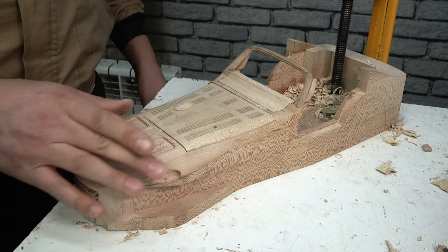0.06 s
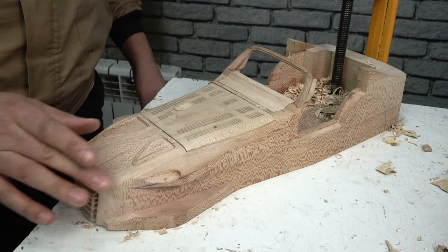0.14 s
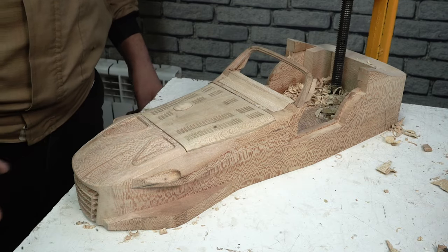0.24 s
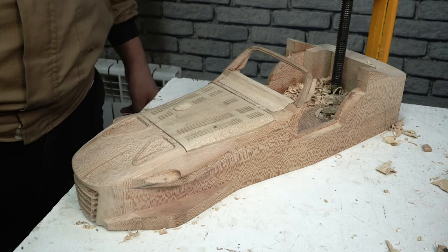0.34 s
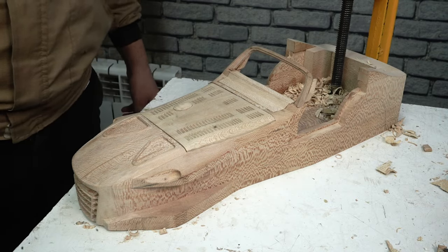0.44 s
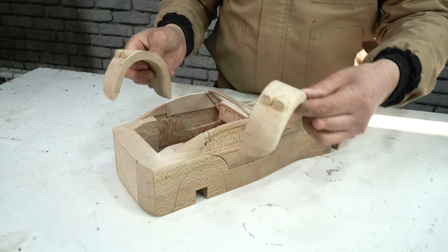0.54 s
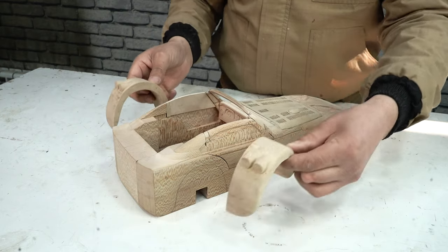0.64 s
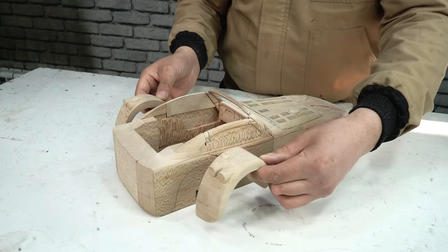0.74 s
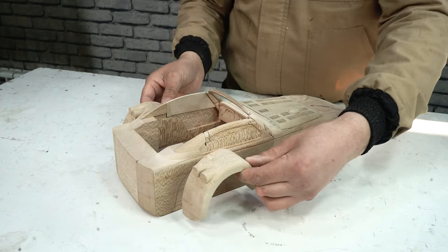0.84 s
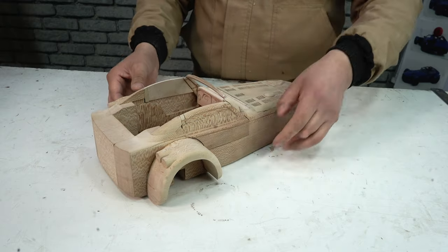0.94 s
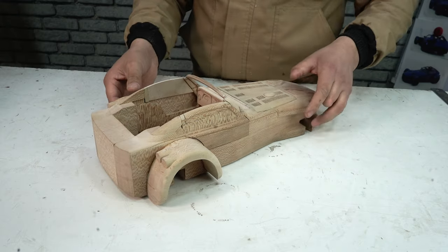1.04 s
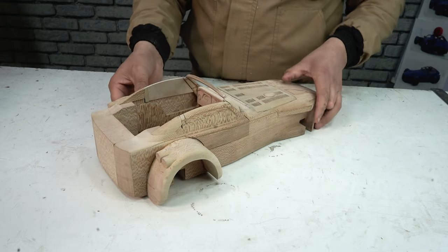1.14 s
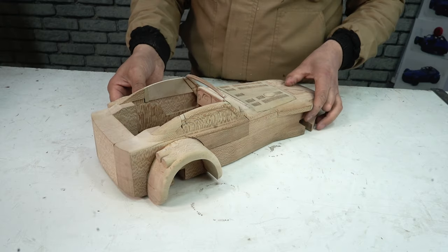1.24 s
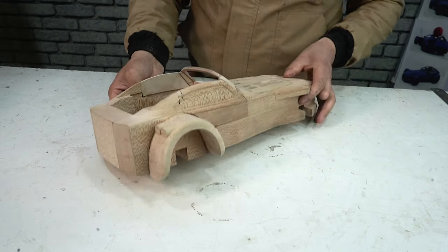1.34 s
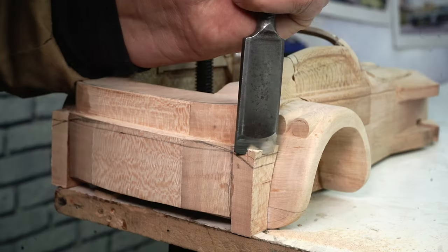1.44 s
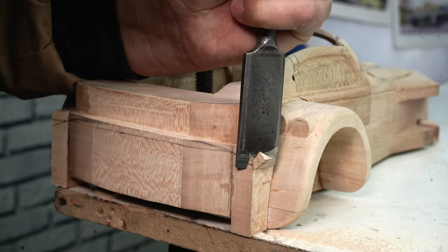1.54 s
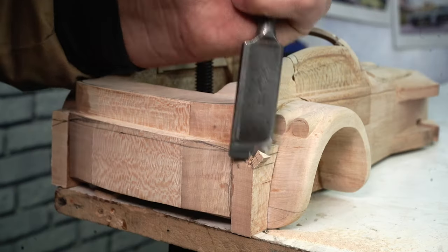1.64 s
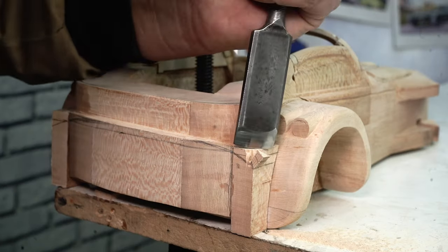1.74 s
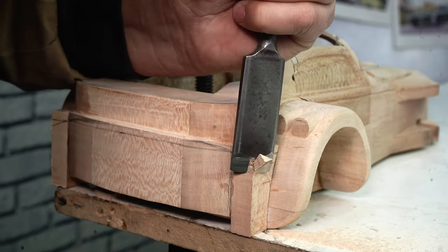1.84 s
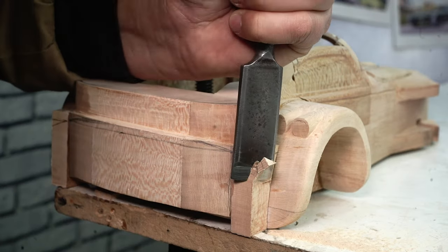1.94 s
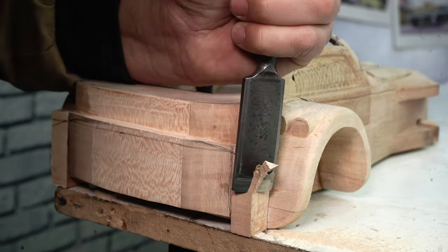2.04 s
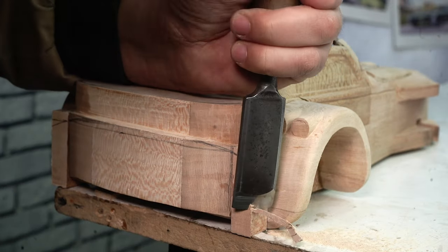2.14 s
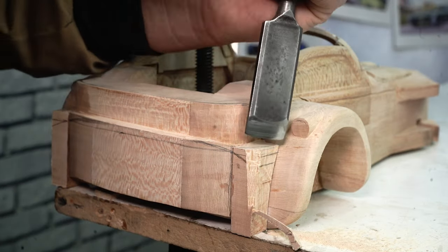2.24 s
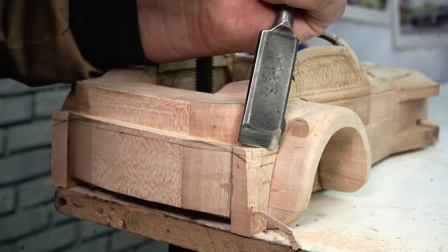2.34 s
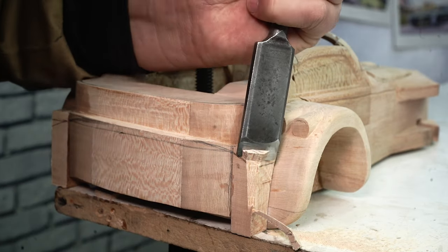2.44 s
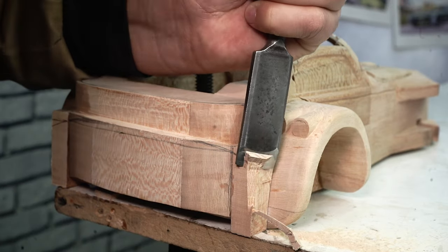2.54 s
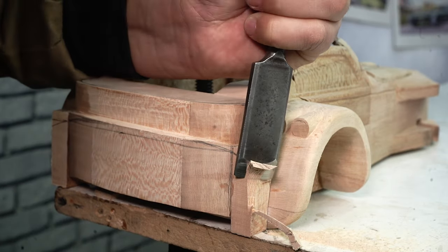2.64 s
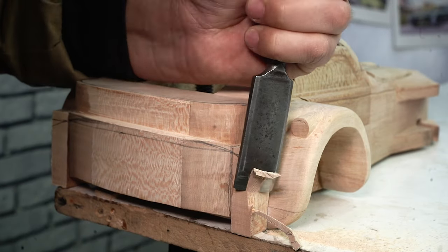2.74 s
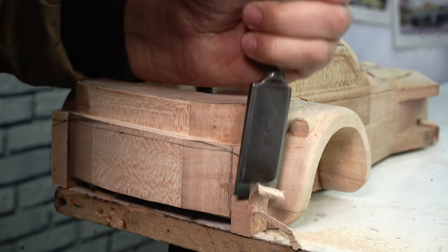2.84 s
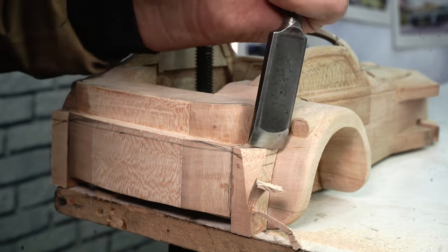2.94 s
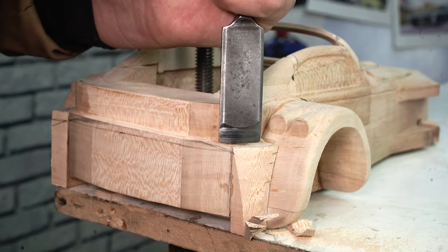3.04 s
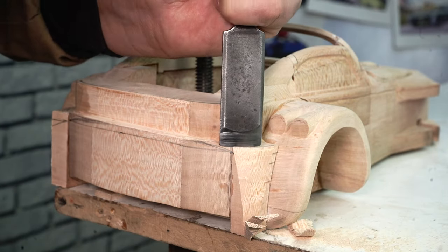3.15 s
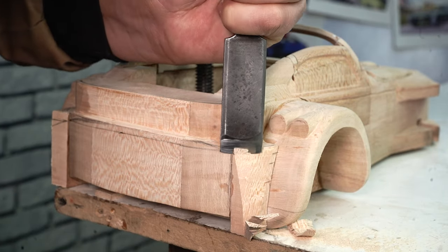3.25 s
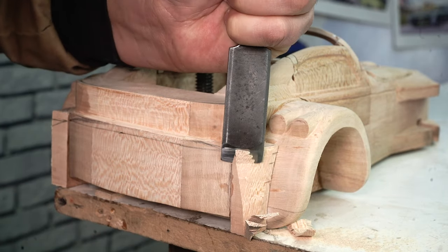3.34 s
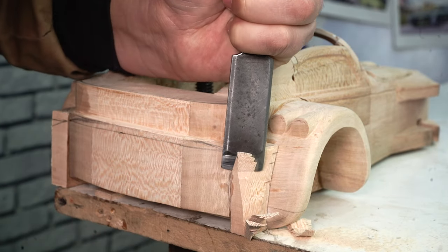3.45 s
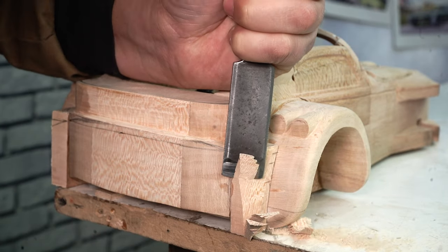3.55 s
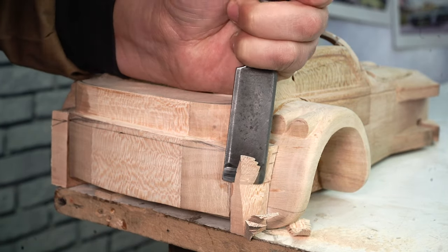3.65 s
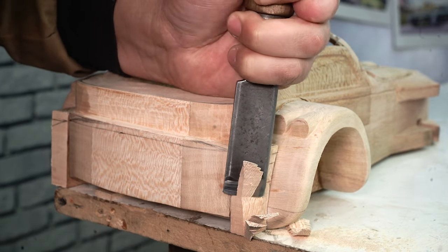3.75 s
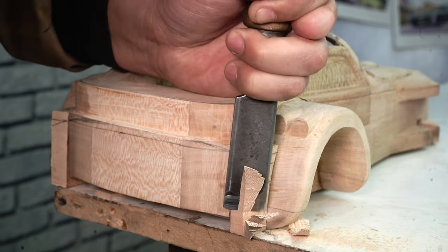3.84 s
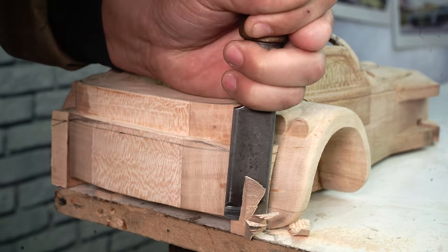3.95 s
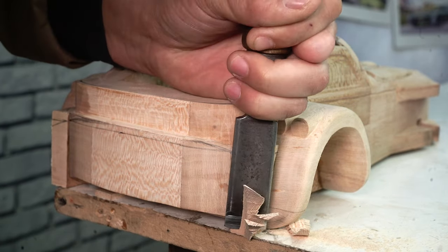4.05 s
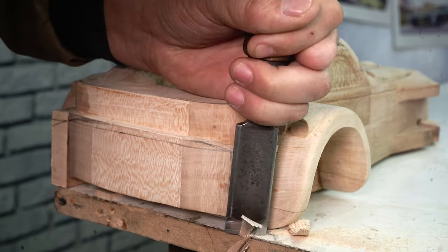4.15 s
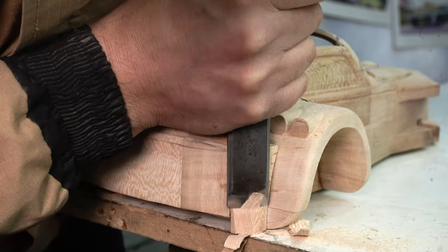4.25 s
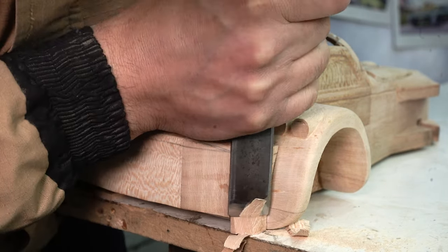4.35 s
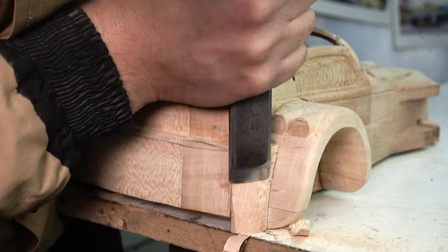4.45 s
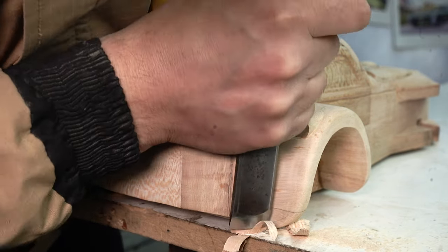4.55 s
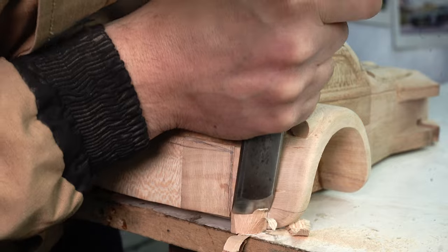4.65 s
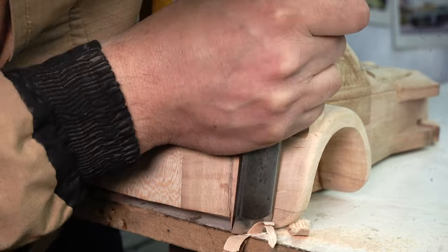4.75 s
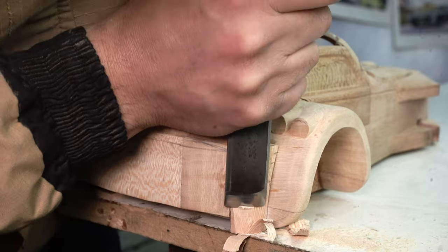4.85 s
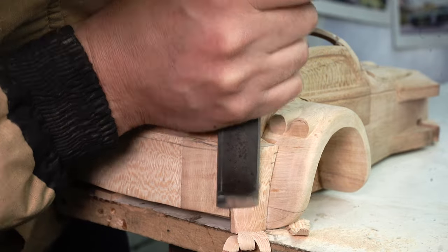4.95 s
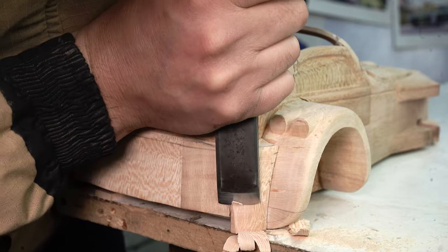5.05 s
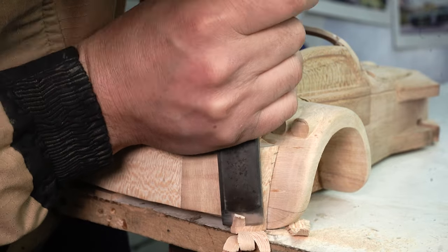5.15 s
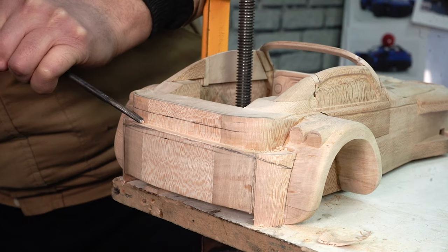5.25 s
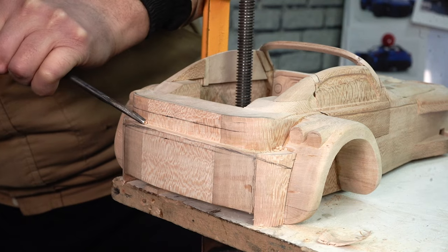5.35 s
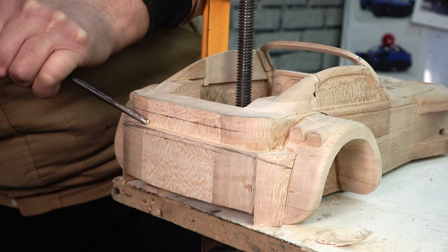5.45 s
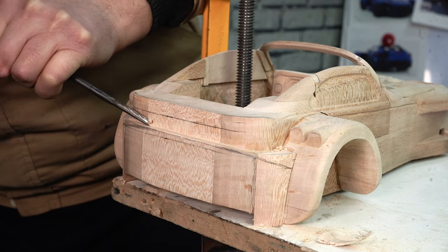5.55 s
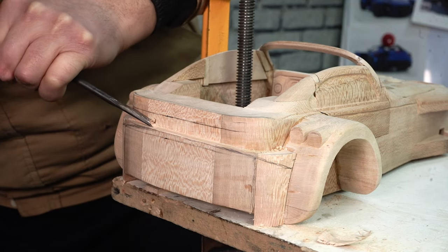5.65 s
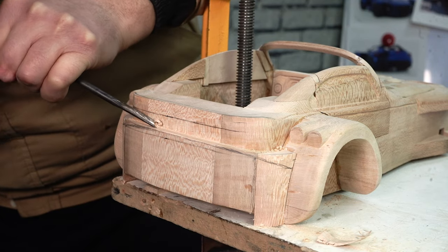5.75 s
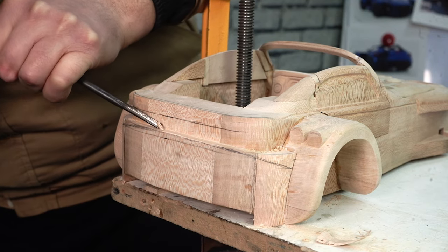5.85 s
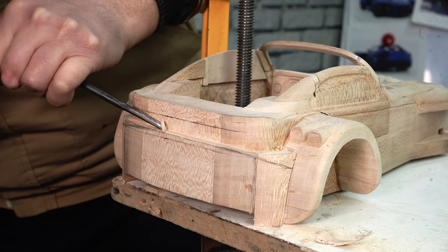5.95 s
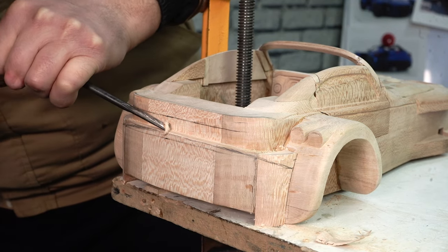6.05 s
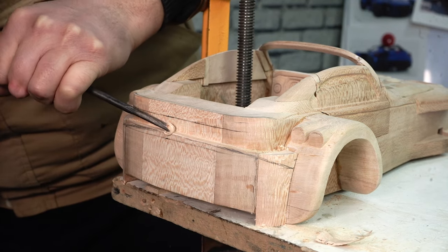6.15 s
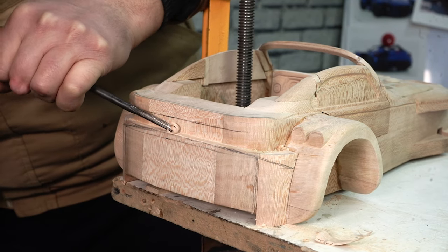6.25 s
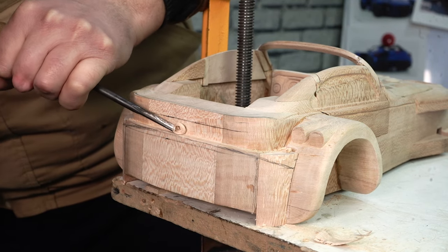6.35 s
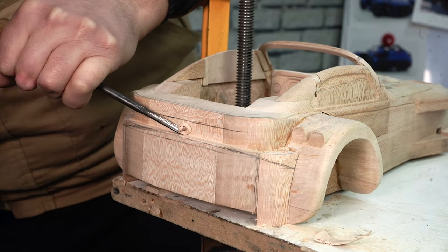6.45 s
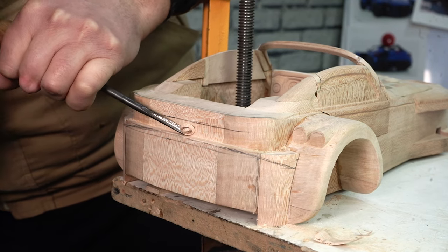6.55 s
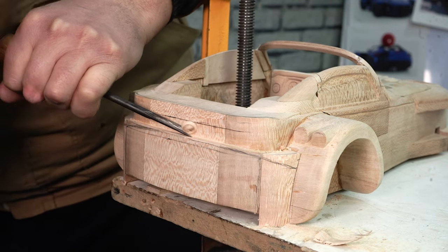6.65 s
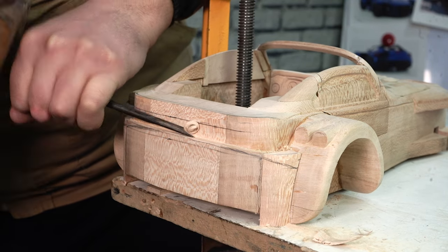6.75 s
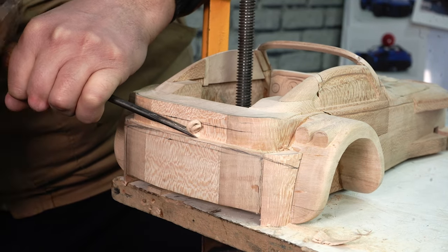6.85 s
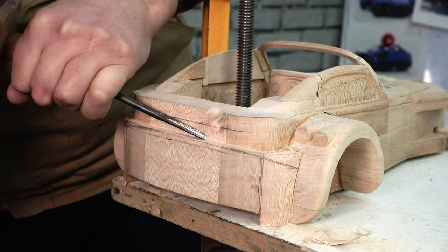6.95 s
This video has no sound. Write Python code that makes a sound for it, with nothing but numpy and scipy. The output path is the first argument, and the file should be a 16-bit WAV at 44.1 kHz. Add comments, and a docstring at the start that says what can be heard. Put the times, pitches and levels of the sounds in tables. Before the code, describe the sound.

In a woodcarving workshop, a compressor hums with a dying air blast and tiny ticks. A hard cut brings wooden parts knocking and fingers rustling. Another cut: close to the microphone, fast mallet taps drive a wide chisel in bursts, each a bright steel crack with a woody knock and short room echo. Then irregular hand pushes scrape and crunch, and steady taps drive a gouge. The compressor and carving sit on the right, the knocks in both channels.

```python
"""Fast mallet taps drive a wide chisel, a hand pushes it, and taps drive a gouge, close to the microphone:
each blow is a crack of ringing steel, then noise echoes coloured by the wood's resonances, and a low knock.
Two scenes come before, joined by hard cuts in a woodcarving workshop: a compressor hums, hisses and ticks
while an air blast dies away; then wooden parts knock as dying sines and fingers rustle as banded noise.
The bench scene is on both channels, the others on the right, with a faint hiss left during the compressor."""
import sys
import numpy as np
from scipy import signal
from scipy.fft import rfft, irfft
from scipy.io import wavfile

SR = 44100
rng = np.random.default_rng(int(sys.argv[2]) if len(sys.argv) > 2 else 0)


def generate_wav(sig):
    """Save sig (samples, or channels by samples) to the path in sys.argv[1] as 16-bit PCM at SR."""
    pcm = np.round(np.clip(np.atleast_2d(sig).T, -1, 1) * 32767).astype(np.int16)
    wavfile.write(sys.argv[1], SR, pcm)


def amplitude_ratio(level_db):
    """Convert a level in decibels to the matching linear amplitude (field) ratio."""
    exponent = np.asarray(level_db, float) / 20
    return 10 ** exponent


N = 308259
T = np.arange(N) / SR
SIZE = 2 ** 15  # samples of one blow with its echoes

BENCH_S, BENCH_SECOND_S, CHISEL_S, PUSH_S, GOUGE_S = .5485, .985, 1.4835, 4.3, 5.29  # where each part's settings take over; the gouge's first blow, at 5.26 s, still sounds with the push settings
TOOL_STARTS_S = (CHISEL_S, PUSH_S, GOUGE_S)
RIGHT_GAIN = 2  # on compressor and carving; their levels below are before this gain

# Compressor. Colour of the room's roar after the air blast. Each row: frequency in Hz, level in dB.
ROAR = [(180, -47), (300, -24.5), (481, -23), (794, -0.5), (908, -6.5), (1190, -7.5), (1390, -35),
        (1930, -23), (3000, -47), (3900, -40), (6600, -120)]
# Colour of the air hiss. Each row: frequency in Hz, level in dB.
HISS = [(1060, -9), (1800, -9), (2440, -12), (5080, -17), (6120, -18), (12200, -16.5), (15800, -24),
        (16500, -37)]
# Colour of the low rumble. Each row: frequency in Hz, level in dB.
RUMBLE = [(20, -4), (30, -4), (60, -11.5), (150, -17), (500, -26), (1000, -28)]
HUM_HZ, HUM_DB, HUM_OVERTONE_DB = 99, -34, -27  # overtone against the hum
HUM_FADES_S, HUM_FADE_LENGTH_S, HUM_FADE_DB = 0.443, .055, -8  # the hum sinks near the end
ROAR_DB, ROAR_T60_S, RUMBLE_DB = -31, 0.71, -49.5
BLAST_HISS_DB, BLAST_HISS_T60_S, STEADY_HISS_DB = -44.5, 0.34, -63.5
TICK_FIRST_S, TICK_GAP_S, TICK_DB, TICK_SPREAD_DB = .063, .0655, -53.5, 1.5  # valve ticks
IDLE_DB = -77.5  # hiss of the unused left input

# Bench. Colour of the low rumble. Each row: frequency in Hz, level in dB.
BENCH_LOW = [(12, -45), (20, -17), (91, 2), (124, -11), (229, -12.5), (275, -18), (312, -16), (387, -14),
             (555, -21.5), (619, -21.5), (1500, -32), (1950, -51), (3300, -120)]
# Colour of the hiss at the bench. Each row: frequency in Hz, level in dB.
BENCH_HISS = [(350, -26), (600, -15), (1180, -18), (1360, -13.5), (4610, -20), (6080, -23.5),
              (15200, -23.5), (16500, -37)]
# Parts knocking. Each row: start in seconds, peak in dB, dull above in Hz, thin below in Hz, factor on t60.
KNOCKS = [(0.9528, -32, 3500, 900, 0.8), (0.964, -38, 1500, 450, 0.16), (0.9742, -32.5, 2800, 800, 0.48),
          (0.9797, -33, 1490, 500, 0.61), (1.05, -54, 1800, 900, .3), (1.12, -41, 1200, 600, 0.097),
          (1.23, -25.5, 1100, 250, 0.96), (1.252, -25, 480, 270, 2.9), (1.267, -39.5, 600, 250, 1.7)]
# Resonances of a wooden part. Each row: frequency in Hz, level in dB, t60 in seconds before the knock's factor.
BLOCK = [(178.6, -3, 0.5), (229, -1, 0.53), (314.5, 10.5, 0.123), (437, 9.5, 0.086), (518, 4.5, 0.1),
         (700, 0.5, 0.1), (920, 2.5, 0.043), (1245, 10, 0.023), (2020, 5, 0.05), (2410, 1, 0.025),
         (3630, -6, .02)]
# Fingers on wood. Each row: start in seconds, length in seconds, level in dB, gain below 10 kHz in dB.
RUSTLES = [(1.123, 0.036, -51.5, -3), (1.163, 0.042, -55, 3), (1.253, 0.013, -46.5, -4),
           (1.312, .03, -60, -6)]
# Squeaky bands of a rustle. Each row: frequency in Hz, width in Hz, level in dB.
RUSTLE_BANDS = [(6800, 790, -2.5), (8700, 810, 0), (10700, 660, -1), (13000, 990, 4), (14900, 1400, -3)]
BENCH_LOW_DB, BENCH_SWELL_DB_PER_S = -52.5, 9.5  # the rumble swells
BENCH_HISS_DB = (-62.5, -58.5)  # before and after the cut within the bench scene

# Room tone of the carving. Each row: frequency in Hz, level in dB.
QUIET = [(76, -31), (130, -17.5), (219, 2.5), (435, -17), (522, -8), (678, -17.5), (1640, -23), (3200, -28),
         (3390, -30), (16000, -47)]
QUIET_DB, UNDERTONE_DB, UNDERTONE_WAVER_DB = -67, -74, 2  # the undertone is a low rumble, wavering slowly

# The blade dragging lightly between pushes. Each row: time in seconds, level in dB.
DRAG = [(4.3, -60.5), (4.5, -53), (4.62, -70), (4.73, -49.5), (4.834, -59), (5.016, -65.5), (5.255, -58.5)]
# Colour of the drag. Each row: frequency in Hz, level in dB.
DRAG_COLOUR = [(900, 16.5), (1500, -10), (3200, 12), (6000, -5), (9000, 3), (13500, -0.5), (15800, 1)]
DRAG_PER_S = 6200  # fibre snaps a second

# Mallet taps. Each row: start in seconds, level of the wood's answer in dB.
TAPS = [(1.48, -29.5), (1.5064, -21), (1.556, -16), (1.5998, -16), (1.8433, -41.5), (1.8939, -17.5),
        (1.946, -17.5), (1.9912, -15.5), (2.0393, -17.5), (2.0844, -18), (2.1282, -20), (2.172, -24.5),
        (2.2154, -26.5), (2.4653, -18.5), (2.5307, -17), (2.582, -16.5), (2.6331, -18), (2.6835, -18),
        (2.7322, -20), (2.781, -21), (2.8296, -23.5), (2.8794, -26), (3.068, -51.5), (3.1214, -62.5),
        (3.214, -26), (3.271, -25.5), (3.3213, -20.5), (3.376, -16.5), (3.434, -15.5), (3.492, -15),
        (3.5475, -15.5), (3.6013, -15), (3.6578, -17), (3.7131, -19), (3.7677, -20), (3.827, -22.5),
        (3.8783, -21.5), (3.9348, -22.5), (3.9877, -23.5), (4.0369, -25), (4.0861, -27.5), (4.128, -27),
        (4.168, -30), (5.3043, -25.5), (5.3504, -25), (5.4017, -27), (5.453, -26), (5.5007, -26),
        (5.5492, -24), (5.5982, -23.5), (5.6483, -22.5), (5.6972, -21.5), (5.7485, -25.5), (5.7981, -26),
        (5.8463, -24), (5.8937, -23.5), (5.9441, -23.5), (5.9895, -23), (6.0384, -22), (6.0874, -21.5),
        (6.134, -21.5), (6.1849, -22), (6.2319, -21), (6.2803, -20.5), (6.3277, -23), (6.375, -25.5),
        (6.4224, -24.5), (6.4698, -22.5), (6.517, -23.5), (6.565, -20.5), (6.6128, -20), (6.6605, -19.5),
        (6.7073, -20), (6.756, -20), (6.8063, -23), (6.857, -24), (6.9038, -22), (6.9503, -25.5)]
# Hand pushes and touches, and last the gouge's first tap, which takes the push settings. Each row: start in
# seconds, level in dB, crack in dB, lead-in scrape in seconds, creak in Hz.
PUSHES = [(4.3058, -36.5, -31.5, 0.0024, 2980), (4.383, -40.5, -40, .0026, 3060),
          (4.418, -18, -40, .006, 2400), (4.57, -31.5, -31, .012, 1450), (4.587, -38, -30, .0054, 4500),
          (4.677, -41, -53.5, 0.0098, 3220), (4.7223, -36, -35, 0.003, 1400),
          (4.767, -23.5, -19, 0.0012, 2750), (4.881, -46.5, -48.5, 0.0027, 1450),
          (4.9057, -34, -44, .01, 3030), (4.9469, -20, -27, .013, 2920), (5.086, -39.5, -48, .005, 3480),
          (5.1115, -34.5, -37, .008, 3340), (5.153, -40.5, -37.5, 0.0029, 2780),
          (5.2022, -28, -34.5, .01, 2900), (5.2594, -25.5, -31, .0012, 1320)]
# Echoes of the room. Each row: frequency in Hz, t60 in seconds, build-up in seconds, both before LINGER.
ROOM = [(200, 0.61, 0.017), (520, 0.26, 0.0017), (1400, 0.22, 0.003), (3600, 0.17, 0.0068),
        (9000, 0.15, 0.0014), (16400, 0.096, 0.00067)]

# From here each table or tuple with one entry a tool is for chisel taps, pushes, gouge taps.
# Echoes for each tool, blended from four random versions. Each row: factor on t60, factor on build-up.
LINGER = [(1.207, 1.22), (1.32, 0.56), (1.065, 1.14)]
# Colour of the struck work. Each row: frequency in Hz, level in dB.
WORK = [
    [(71, -8), (120, -37), (257, -9.5), (388, -14), (563, -13.5), (766, -9.5), (849, -10), (1160, -9),
     (2640, -6), (3170, -2), (9860, -7), (15200, -15), (16500, -16)],
    [(71, -72), (120, -17), (257, -3), (297, -10.5), (373, -20), (551, -7.5), (751, -18), (961, -12.5),
     (1820, -6), (2810, -5), (10100, -9.5), (13700, -9), (16500, -8)],
    [(71, -36), (120, -30), (160, -60), (263, -5), (449, -19), (551, -2.5), (650, -13), (849, -6.5),
     (1900, -9.5), (5890, -4.5), (6530, -7), (14900, -13), (16500, -35)],
]
# Resonances of the work. Each row: frequency in Hz, width in Hz, height in dB, dB a second as the cut deepens.
WORK_RINGS = [
    [(251, 9.9, 5.5, -2), (568, 57, 6.5, 0), (861, 43, 11.5, -1.9), (1674, 29, 6.5, 1),
     (2115, 167, 11, -2.3), (2544, 49, 9, -1), (2710, 163, 8, 0.5), (3013, 24, 9.5, -3.7),
     (5050, 59, 7.5, -3.5), (5560, 210, 5.5, -2)],
    [(262, 21, 9, -9), (915, 320, 6, -0.5), (1405, 90, 4.5, -2.5), (2830, 44, 8, -3), (3340, 130, 5.5, -1),
     (4500, 54, -4.5, 8), (5830, 550, 4, -2)],
    [(574, 19, 0.5, 4), (851.5, 23, 7.5, 3), (2520, 57, 8.5, -7), (989, 6.7, 13, -1), (1100, 154, 9.5, -4),
     (2698, 61, 9.5, -2.5), (3360, 73, 9, -4.5), (5900, 460, 8, -9)],
]
# Steel ringing straight at the microphone. Each row: frequency in Hz, level in dB, t60 in seconds.
STEEL = [
    [(3815, 7.5, 0.01), (5900, 11.5, 0.0042), (8210, -0.5, 0.02), (9650, 7.5, 0.0097),
     (11600, -2.5, 0.0098), (14540, 2, 0.0084), (2460, 8, 0.0066), (14900, 1, 0.0059)],
    [(3056, 3.5, 0.014), (4880, -9, 0.024), (5700, 0.5, 0.012), (8500, -10, 0.0085), (13100, -1, .003)],
    [(2437, -4.5, 0.017), (4220, -3, 0.016), (5290, 5, 0.0053), (5840, 9, 0.0064), (8010, -1, 0.015),
     (9070, -2, 0.014), (10920, -5.5, 0.012), (13100, -14, .005)],
]
# The block's own low knock, heard directly. Each row: frequency in Hz, level in dB, t60 in seconds.
BODY = [
    [(266, -6, 0.18), (559.5, 1.5, 0.11), (835, 1, 0.056), (1670, 4, 0.037)],
    [(256, 0, 0.15), (958, -8, 0.027), (1450, -8, .03)],
    [(552, -2, 0.062), (848.4, -1.5, 0.24), (968, 2, 0.069), (1103, -14, 0.029)],
]
# Middle over treble. Each row: dB at full force, dB for each dB of lost force, dB a second.
MIDDLE = [(3.94, 0.12, -.4), (0.81, 0.1, -3.8), (1.4, .05, 2.5)]
# Bass over treble. Each row: dB at full force, dB for each dB of lost force, dB a second.
BASS = [(3, 0.11, -0.6), (-3.5, 0.26, 2), (0.27, .05, 2.5)]
# Steel crack, for chisel and gouge taps only. Each row: level in dB, dB a second as the cut deepens.
TAP_CRACK = [(-20, 0.5), (-18.5, -3)]
# The chisel ringing freely when it only touches the wood. Each row: frequency in Hz, level in dB, t60 in seconds.
LOOSE = [(1090, -3, .12), (2500, -2, .08), (3250, 0, .13), (4390, 0, .07), (6600, -9, .06)]
LOOSE_DB, TOUCH_BELOW_DB = 0, -36  # against the touch; taps below this level only touch
TAP_LEAD_S = .0008  # over which the fibres start to tear
TOUCH_CRACK_DB, CRACK_SPREAD_DB = 5, 1.1  # most a crack may exceed the tap's level; spread between taps
FULL_DB, TONE_SPREAD_DB = -15.5, 0.88  # level of full force; spread of middle and bass
SAG = (0.00082, 0.00089, 0.013)  # share of pitch the steel loses a second as the blade sinks in
BRIGHTEN = (0.043, 0.41, 0.055)  # dB of top gained for each dB of force
UNEVEN = (.25, .4, .15)  # how each resonance varies from blow to blow, in height and a little in pitch
TAIL_DB = (17.5, 20, 16)  # how much of each tool's sound comes back from the room
BODY_DB, BODY_DB_PER_S = (-21.5, -27, -21), (.1, 1, 4)  # against the blow's bass; growing as the cut deepens
# the first instant of contact, its level against the crack (for pushes, a level that falls faster than force)
SNAP_HZ, SNAP_T60_S, SNAP_DB = (6760, 13550, 8130), (0.00089, 0.0054, .0012), (-3.5, 3, -14)
# later fibre snaps as the shaving tears: level at full force, dB lost for each dB of lost force
TEAR_S, TEAR_DB, TEAR_FALLS = .03, (-4.5, -5.5, -11), 0.93
CREAK_DB, CREAK_DB_PER_DB, CREAK_WIDTH_HZ = 5, .4, 100  # lighter pushes creak more clearly


def evened(x):
    """Scales to rms 1."""
    return x / np.sqrt(np.mean(x ** 2) + 1e-20)


def read(points, hz, axis=1):
    """Reads a column of a table along a logarithmic frequency axis."""
    rows = np.transpose(points)
    return np.interp(np.log(hz + 1), np.log(rows[0] + 1), rows[axis])


def add(mix, s, sound):
    """Lays a sound into the mix at s seconds."""
    part = mix[round(s * SR):][:len(sound)]
    part += sound[:len(part)]


def noise(points, count):
    """Noise of a given colour, silent outside the table's range, rms 1."""
    hz = np.fft.rfftfreq(count, 1 / SR)
    inside = (hz > points[0][0]) & (hz < points[-1][0])
    spectrum = rfft(rng.standard_normal(count))
    return evened(irfft(spectrum * amplitude_ratio(read(points, hz)) * inside, count))


def causal(db):
    """Minimum-phase response for a gain curve: fold the cepstrum."""
    cep = irfft(db * np.log(10) / 20)
    fold = np.r_[1, 2 * np.ones(len(cep) // 2 - 1), 1, np.zeros(len(cep) // 2 - 1)]
    return np.exp(rfft(cep * fold))


def ring(modes, detune, stretch=1, count=SR // 2, rise=0.00023):
    """Dying sines, one a mode, swelling over the contact time; peak 1."""
    t = np.arange(count) / SR
    x = np.zeros(count)
    for (hz, db, t60), factor in zip(modes, detune):
        x += amplitude_ratio(db - 60 * t / (t60 * stretch)) * np.sin(2 * np.pi * hz * factor * t)
    x = x * (1 - np.exp(-t / rise))
    return x / abs(x).max()


def peak(hz, centre, width):
    """A resonance curve of height 1."""
    return 1 / (1 + (2 * (hz - centre) / width) ** 2)


def tails(decay, build, count=4):
    """Spectra of echoes that build up and die, band by band; the first stand out singly; energy 1."""
    length = SIZE // 2 + 4096
    t = np.arange(length) / SR
    uneven = np.minimum(rng.exponential(1, (count, length)), 4)
    taps = rng.standard_normal((count, length)) * amplitude_ratio(3.5 * np.exp(-t / .03) * uneven)
    hz, at, z = signal.stft(taps * amplitude_ratio(-5 * np.exp(-t / 0.011)), SR, nperseg=128)
    rise = 1 - np.exp(-(at + 0.0055) / (build * read(ROOM, hz, axis=2))[:, None])
    fall = amplitude_ratio(-60 * at / (decay * read(ROOM, hz))[:, None])
    x = signal.istft(z * rise * fall, SR, nperseg=128)[1][:, :length]
    return rfft(x / np.linalg.norm(x, axis=1)[:, None], SIZE)


def idle_input():
    """Faint coloured noise of the unused left input, during the compressor scene."""
    return amplitude_ratio(IDLE_DB) * noise([(20, 21), (200, 5), (1000, 0), (16000, -2)], N) * (T < BENCH_S)


def room_tone():
    """Steady room noise under the carving, with a low rumble whose level wavers slowly."""
    waver = UNDERTONE_WAVER_DB * noise([(.5, -12), (4, 5)], N)
    low = amplitude_ratio(UNDERTONE_DB + waver) * noise([(35, -6.0), (60, -12), (100, -3.5), (140, -13)], N)
    return (low + amplitude_ratio(QUIET_DB) * noise(QUIET, N)) * (T >= CHISEL_S)


def compressor():
    """Motor hum of two sines over rumble, the room roaring after an air blast, hiss and valve ticks."""
    hum_db = HUM_DB + HUM_FADE_DB * np.clip((T - HUM_FADES_S) / HUM_FADE_LENGTH_S, 0, 1)
    overtone = amplitude_ratio(HUM_OVERTONE_DB) * np.sin(2 * np.pi * 2 * HUM_HZ * T)
    out = np.sqrt(2) * amplitude_ratio(hum_db) * (np.sin(2 * np.pi * HUM_HZ * T) + overtone)
    out += amplitude_ratio(ROAR_DB - 60 * T / ROAR_T60_S) * noise(ROAR, N)
    hiss_level = amplitude_ratio(BLAST_HISS_DB - 60 * T / BLAST_HISS_T60_S) + amplitude_ratio(STEADY_HISS_DB)
    out += hiss_level * noise(HISS, N) + amplitude_ratio(RUMBLE_DB) * noise(RUMBLE, N)
    tick = ring([(6170, 0, 0.022), (3760, -2, .012)], (1, 1), count=2048)
    for i, k in enumerate(rng.standard_normal(7)):
        add(out, TICK_FIRST_S + i * TICK_GAP_S, amplitude_ratio(TICK_DB + TICK_SPREAD_DB * k) * tick)
    return out * (T < BENCH_S)


def bench_air():
    """Room rumble that swells, and hiss that steps up at the cut within the scene."""
    low_db = BENCH_LOW_DB + BENCH_SWELL_DB_PER_S * np.clip(T - BENCH_S, 0, 1)
    hiss_db = np.where(T < BENCH_SECOND_S, *BENCH_HISS_DB)
    return amplitude_ratio(low_db) * noise(BENCH_LOW, N) + amplitude_ratio(hiss_db) * noise(BENCH_HISS, N)


def rustles():
    """Fingers sliding on wood: short bursts of noise in squeaky bands."""
    out = np.zeros(N)
    for s, length, db, low_db in RUSTLES:
        count = round(length * SR)
        hz = np.fft.rfftfreq(count, 1 / SR)
        gain = np.zeros(len(hz))
        for f, width, g in RUSTLE_BANDS:
            gain += amplitude_ratio(g + low_db * (f < 10000)) / (1 + (2 * (hz - f) / width) ** 4)
        rub = evened(irfft(rfft(rng.standard_normal(count)) * gain, count))
        add(out, s, amplitude_ratio(db) * rub * signal.windows.tukey(count, .6))
    return out


def knocks():
    """Wooden parts knocking: a softer contact leaves the high modes quiet, a lighter part the low ones."""
    out = np.zeros(N)
    for s, db, dull_hz, thin_hz, stretch in KNOCKS:
        modes = []
        for f, g, t60 in BLOCK:
            loss_db = 10 * np.log10((1 + (f / dull_hz) ** 6) * (1 + (thin_hz / f) ** 4))
            modes.append((f, g + 2 * rng.standard_normal() - loss_db, t60))
        sound = amplitude_ratio(db) * ring(modes, np.ones(len(BLOCK)), stretch, rise=.6 / dull_hz)
        if s < BENCH_SECOND_S:  # the cut ends the first rings
            sound = sound[:round((BENCH_SECOND_S - s) * SR)]
        add(out, s, sound)
    return out


def bench():
    """Air, rustles and knocks, held between the hard cuts."""
    return (bench_air() + rustles() + knocks()) * (T >= BENCH_S) * (T < CHISEL_S)


def drag():
    """Tiny fibre snaps of uneven size, coloured by blade and wood."""
    size = amplitude_ratio(3.5 * np.minimum(rng.exponential(1, N), 3))
    snaps = (rng.random(N) < DRAG_PER_S / SR) * rng.standard_normal(N) * size
    hz = np.fft.rfftfreq(2048, 1 / SR)
    grain = irfft(causal(read([(300, -44)] + list(DRAG_COLOUR), hz)))
    level = amplitude_ratio(np.interp(T, *np.transpose(DRAG))) * (T > PUSH_S) * (T < GOUGE_S)
    return level * evened(signal.oaconvolve(snaps, grain)[:N])


def blows():
    """Taps and pushes as one list: start s, level dB, crack dB, lead-in s, creak Hz (0 for taps)."""
    rows = []
    for s, db in TAPS:
        gouge = int(s > GOUGE_S)
        crack_db, grows = TAP_CRACK[gouge]
        crack_db += grows * (s - (GOUGE_S if gouge else CHISEL_S)) + CRACK_SPREAD_DB * rng.standard_normal()
        rows.append((s, db, min(crack_db, db + TOUCH_CRACK_DB), TAP_LEAD_S, 0))
    return rows + list(PUSHES)


def balance(row, lost_db, elapsed, k):
    """Middle or bass over treble: it shifts with lost force and with time into the cut."""
    db, soft, grows = row
    return db + soft * lost_db + grows * elapsed + TONE_SPREAD_DB * k


def tearing(tool, lost_db):
    """One impulse for the blow, then scattered fibre snaps as the shaving goes on tearing; energy 1."""
    tear = np.zeros(SIZE)
    places = (rng.uniform(.2, 1, 8) * TEAR_S * SR).astype(int)
    level = amplitude_ratio(TEAR_DB[tool] - TEAR_FALLS * lost_db)
    tear[np.r_[0, places]] = np.r_[1, level * rng.standard_normal(8) / np.sqrt(8)]
    return tear / np.linalg.norm(tear)


def carving():
    """Each blow: a direct crack of steel and low knock, and the work's resonances spread through the room."""
    out, hz, t = np.zeros(N), np.fft.rfftfreq(SIZE, 1 / SR), np.arange(SIZE) / SR
    rooms = [tails(*factors) for factors in LINGER]
    treble_hz = np.geomspace(4500, 12000, 20)
    colours = [read(points, hz) - read(points, treble_hz).mean() for points in WORK]
    for s, treble_db, crack_db, lead_s, creak_hz in blows():
        tool = int(np.searchsorted(TOOL_STARTS_S[1:], s))
        elapsed = s - TOOL_STARTS_S[tool]  # the cut deepens with time
        lost_db = FULL_DB - treble_db
        echo_k, pitch_k, height_k, work_k, tone_k = np.split(rng.standard_normal(32), [4, 12, 20, 30])
        middle_db = balance(MIDDLE[tool], lost_db, elapsed, tone_k[0])
        bass_db = balance(BASS[tool], lost_db, elapsed, tone_k[1])

        colour = colours[tool].copy()
        for (f, width, db, grows), k in zip(WORK_RINGS[tool], work_k):
            height = (db + grows * elapsed) * (1 + UNEVEN[tool] * k)
            colour += height * peak(hz, f * (1 + UNEVEN[tool] ** 2 * k / 10), width)
        top_db = BRIGHTEN[tool] * (treble_db + 19)
        colour += read([(700, bass_db), (2500, middle_db), (6500, 0.014), (14000, top_db)], hz)
        if creak_hz:
            colour += (CREAK_DB + CREAK_DB_PER_DB * lost_db) * peak(hz, creak_hz, CREAK_WIDTH_HZ)

        # like blows excite like echoes, never quite the same
        blend = echo_k + [1.76, 0, 0.93, 0.11]
        echoes = blend / np.linalg.norm(blend) @ rooms[tool]
        wet = irfft(rfft(tearing(tool, lost_db)) * causal(colour) * echoes)
        swell = 1 - np.exp(-(t / lead_s) ** 2)  # fibres tear over the length of the stroke
        add(out, s + .0013 - lead_s, amplitude_ratio(treble_db + TAIL_DB[tool]) * wet * swell)

        steel = [(f, db + 1.5 * k, t60) for (f, db, t60), k in zip(STEEL[tool], height_k)]
        pitch = 1 - SAG[tool] * elapsed + 0.011 * pitch_k
        add(out, s + 0.00069, amplitude_ratio(crack_db) * ring(steel, pitch, count=2048, rise=0.00028))

        snap_db = treble_db - lost_db if creak_hz else crack_db  # only hard pushes snap
        snap_mode = [(SNAP_HZ[tool], 0, SNAP_T60_S[tool])]
        snap = ring(snap_mode, 1 + 0.068 * pitch_k, count=256, rise=0.00006)
        add(out, s + 0.000902, amplitude_ratio(snap_db + SNAP_DB[tool]) * snap)

        if tool == 0 and treble_db < TOUCH_BELOW_DB:
            loose = [(f, db + 4 * k, t60) for (f, db, t60), k in zip(LOOSE, height_k)]
            free = ring(loose, 1 + 0.00964 * pitch_k, count=8192, rise=0.0007)
            add(out, s, amplitude_ratio(treble_db + LOOSE_DB) * free)

        body_db = treble_db + bass_db + BODY_DB[tool] + BODY_DB_PER_S[tool] * elapsed
        body = ring(BODY[tool], 1 + 0.0029 * pitch_k, count=8192, rise=0.002)
        add(out, s + 0.00093, amplitude_ratio(body_db) * body)
    # keep the blows' sound above 150 Hz
    out = signal.sosfilt(signal.butter(4, 150, "high", fs=SR, output="sos"), out)
    return out * (T >= CHISEL_S)


def scene():
    """The bench is shared by both channels, compressor and carving sit right."""
    both = bench()
    right = RIGHT_GAIN * (room_tone() + compressor() + drag() + carving())
    return np.array([both + idle_input(), both + right])


def band_limit(x):
    """A steep low-pass at the top of the band."""
    return signal.sosfilt(signal.butter(12, 15950, fs=SR, output="sos"), x)


def record(dry):
    """Gives the finished mix its last processing."""
    return band_limit(dry)


dry = scene()
out = record(dry)
generate_wav(out)
```